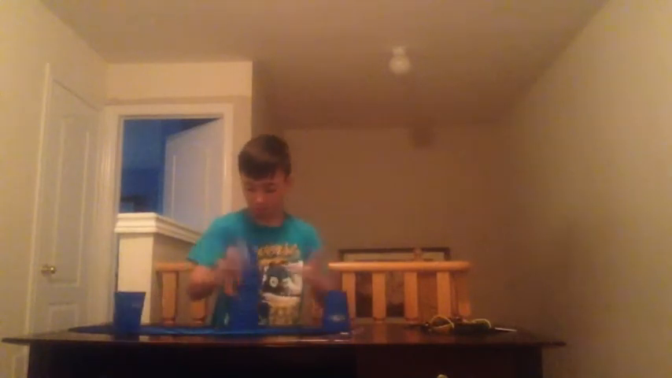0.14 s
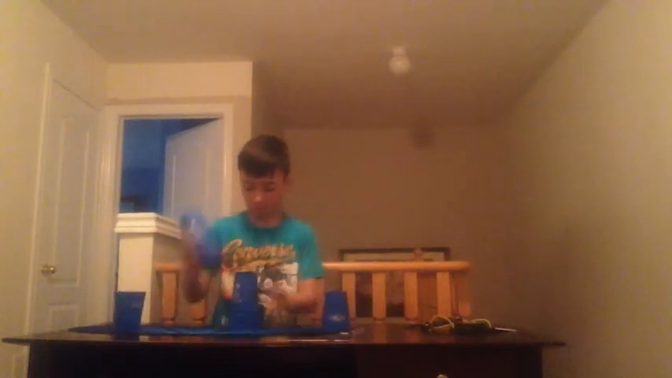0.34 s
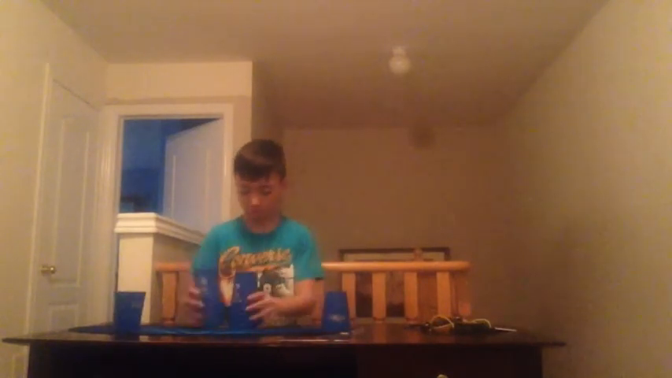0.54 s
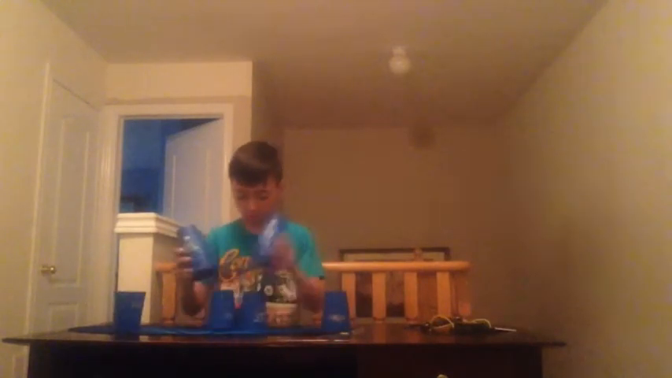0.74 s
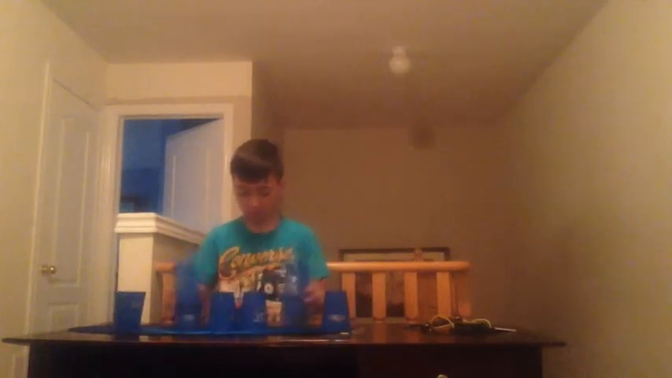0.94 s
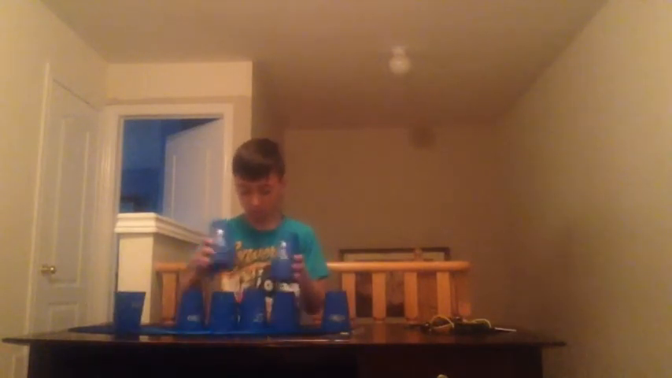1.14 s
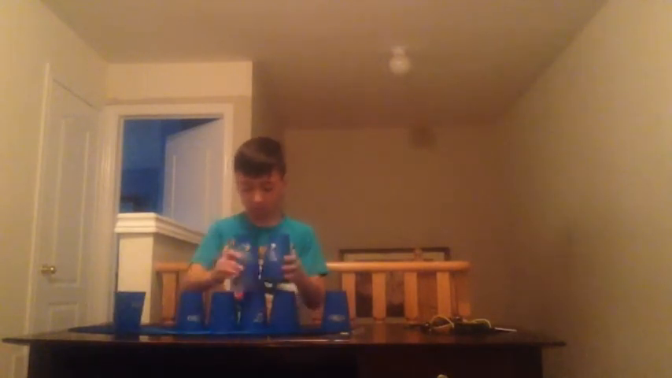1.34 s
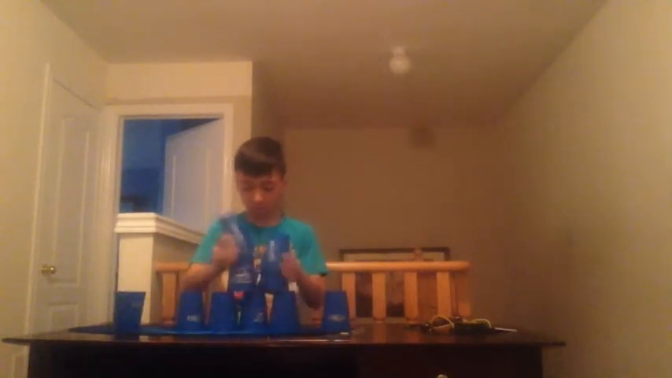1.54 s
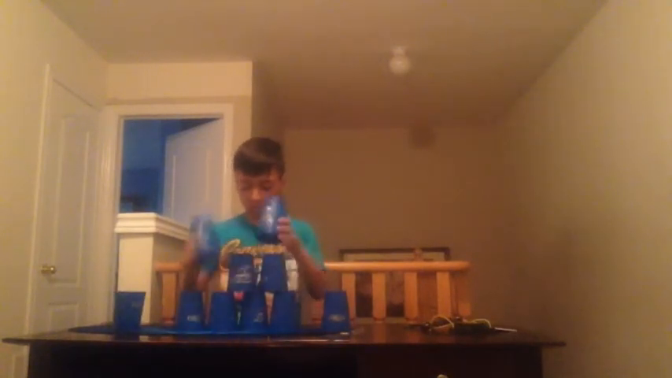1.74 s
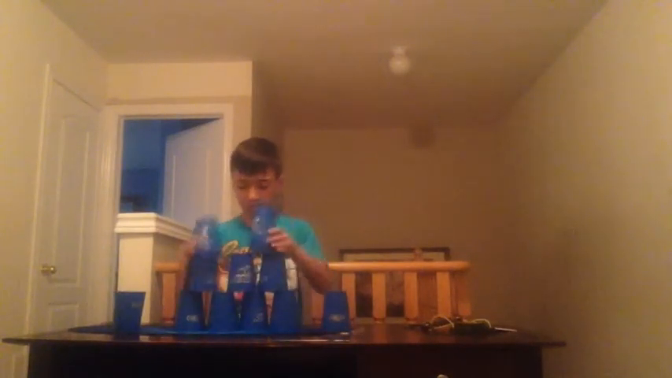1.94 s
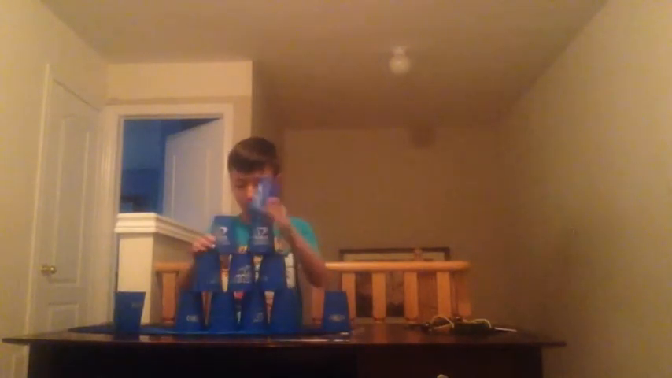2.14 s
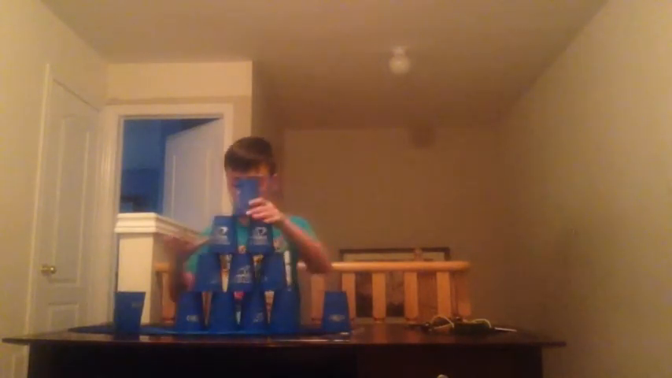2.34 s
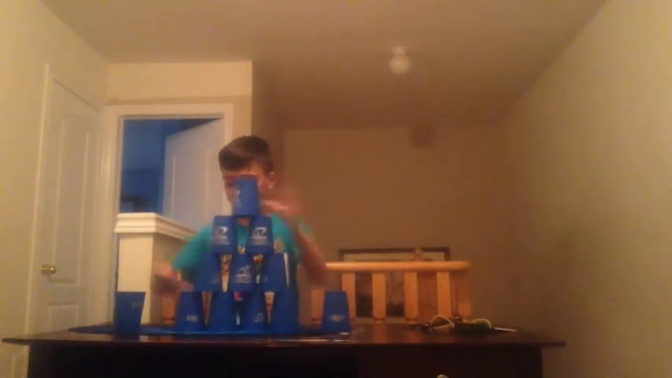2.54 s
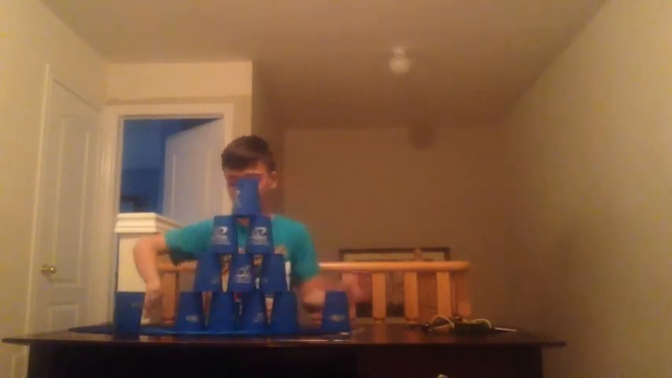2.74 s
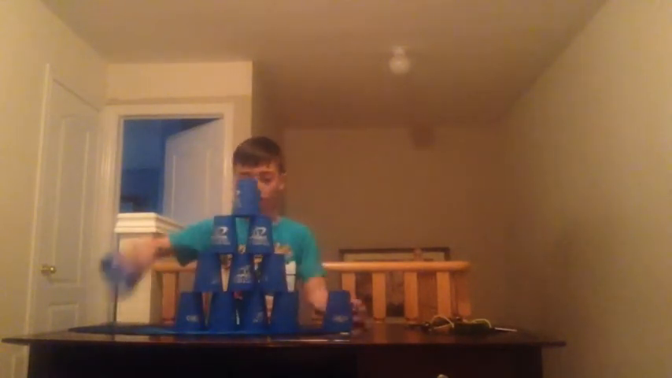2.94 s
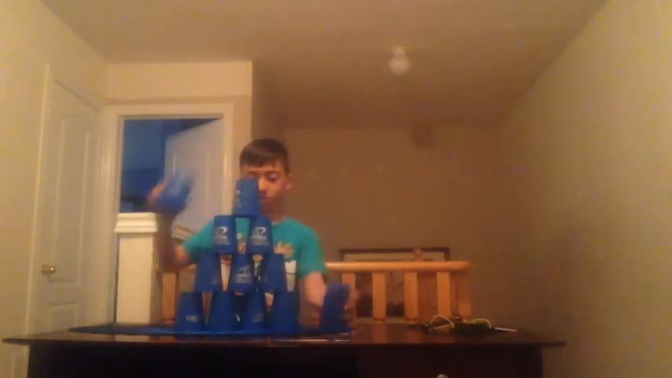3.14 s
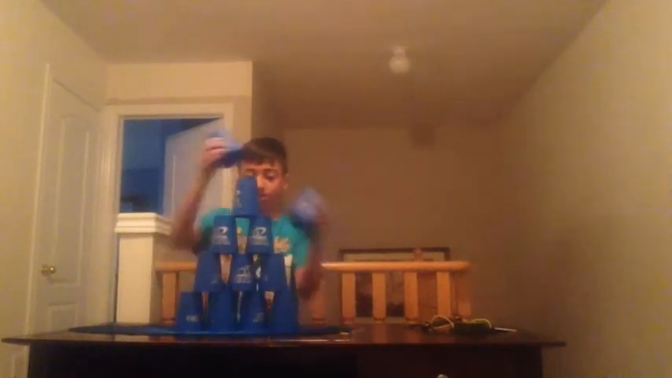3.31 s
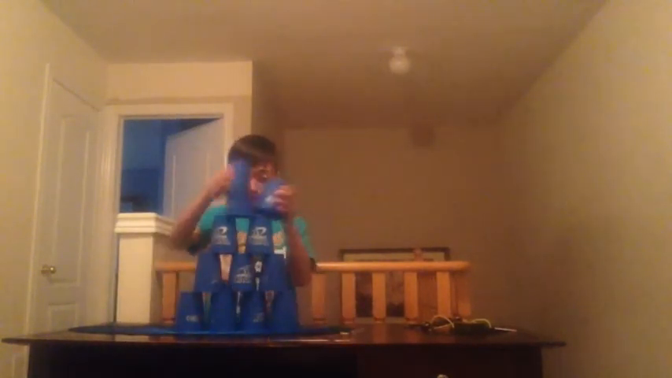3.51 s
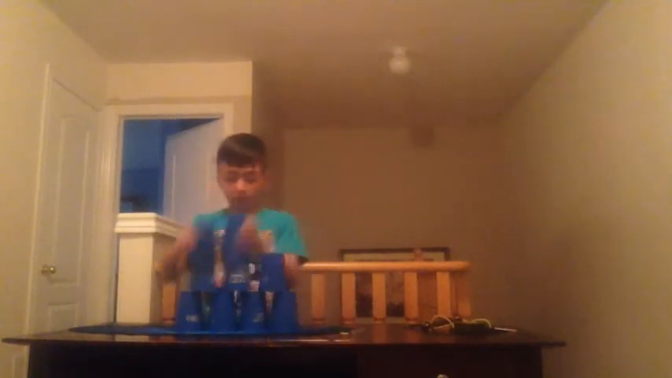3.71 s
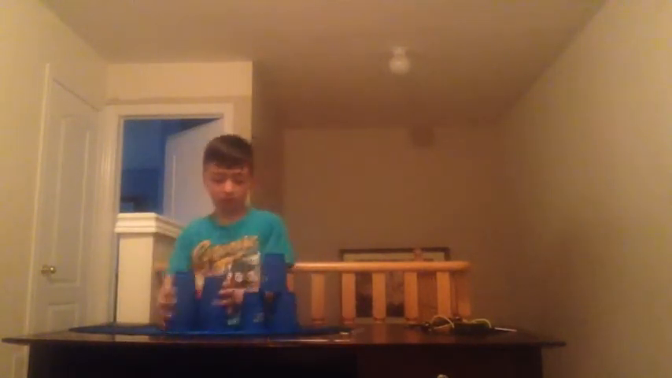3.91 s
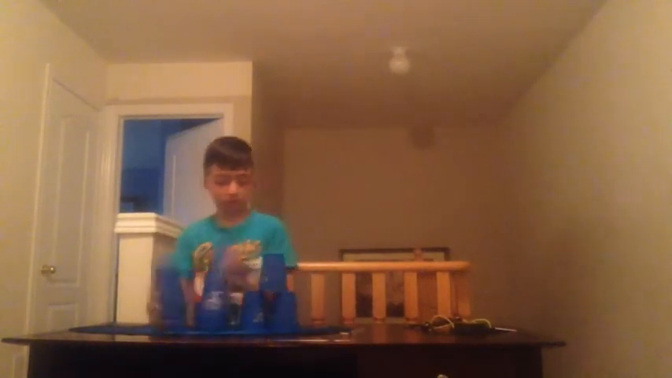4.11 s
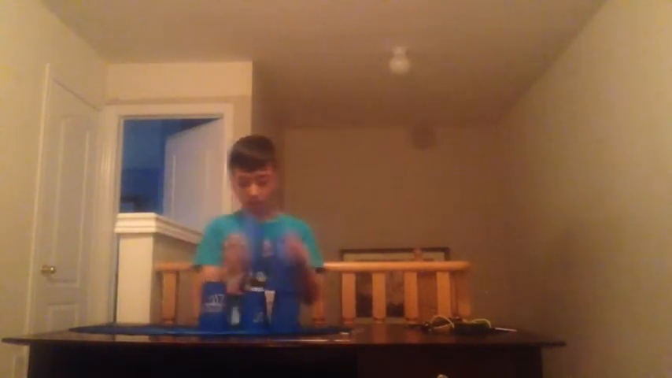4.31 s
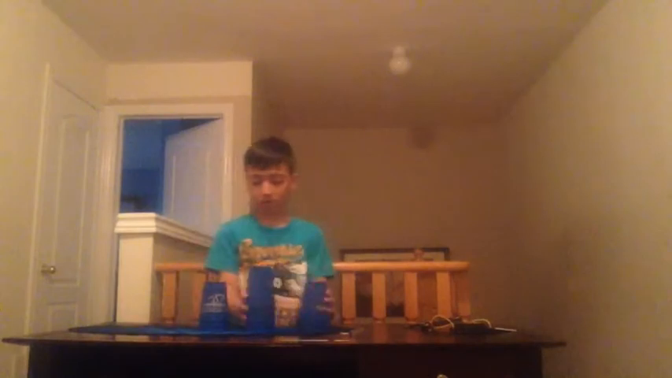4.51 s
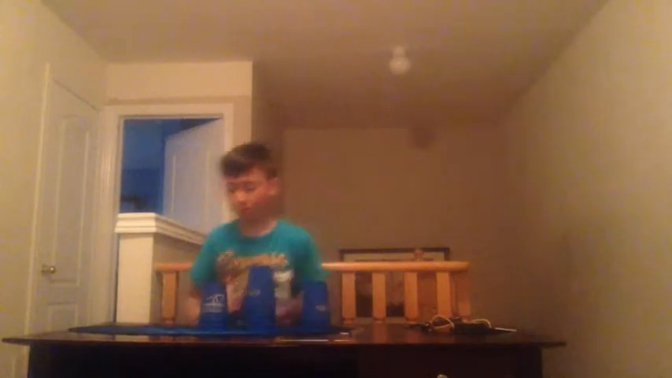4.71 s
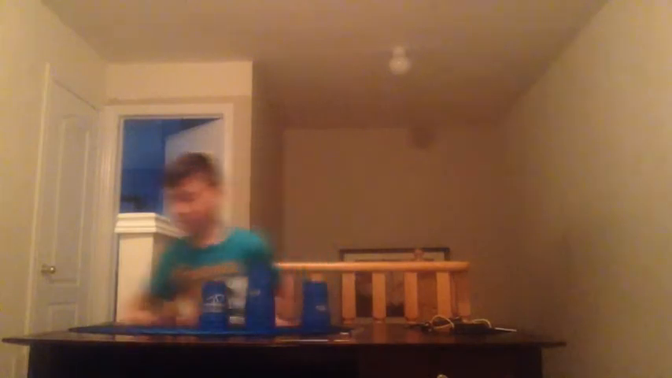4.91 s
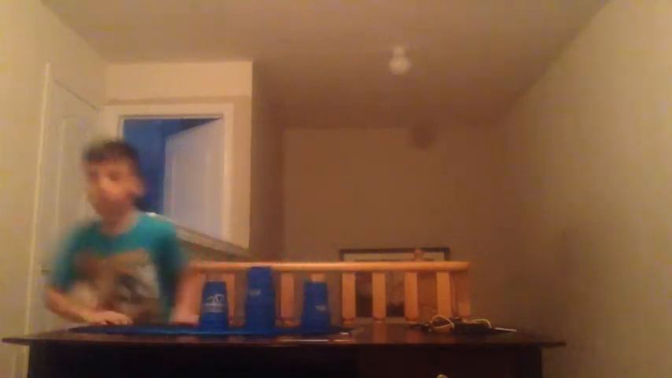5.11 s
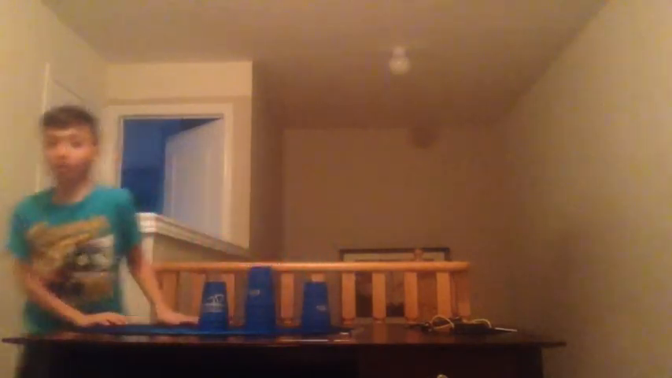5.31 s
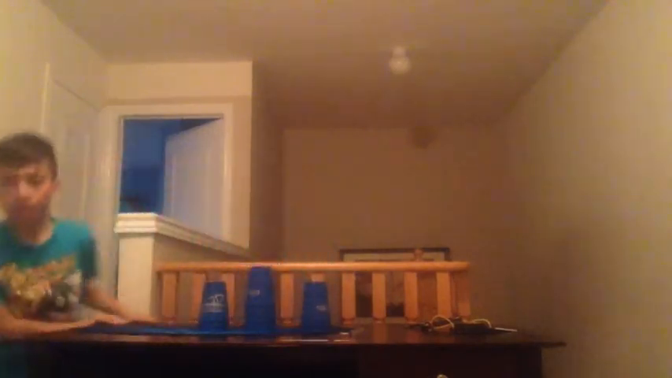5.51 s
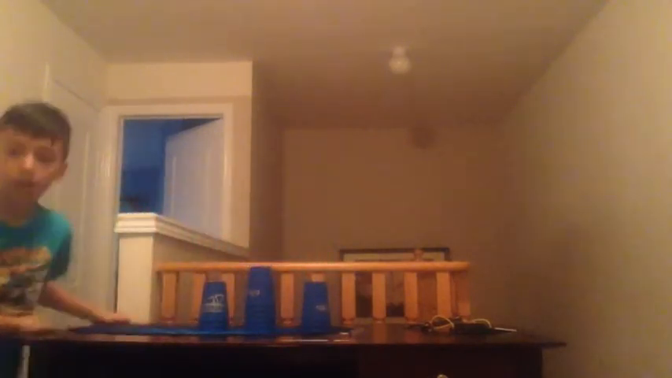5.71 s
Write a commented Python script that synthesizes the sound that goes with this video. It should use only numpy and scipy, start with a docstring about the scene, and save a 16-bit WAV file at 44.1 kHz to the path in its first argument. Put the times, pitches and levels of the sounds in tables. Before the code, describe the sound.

Plastic cups clatter in rapid bursts on a wooden table in a bare, echoing small room, then a palm drags briefly across a mat.

```python
"""Plastic cups are stacked into a pyramid and swept down on a mat on a wooden table in a bare small room.
Quiet air runs throughout. From the start blows ring cup air, cup wall and table as decaying modes; rims tick
as noise bursts, walls clack as modes. Soon cups and hands slide as grainy noise; at the end a palm drags
two resonances of filtered noise. Echoes last half a second; a small microphone cuts the bass and overloads."""
import sys
import numpy as np
from scipy import signal
from scipy.fft import rfft, irfft
from scipy.io import wavfile
from scipy.ndimage import uniform_filter1d

SR = 44100
rng = np.random.default_rng(int(sys.argv[2]) if len(sys.argv) > 2 else 0)


def pcm_store(signal):
    """Save signal as 16-bit PCM."""
    levels = np.round(np.clip(np.atleast_2d(signal), -1, 1) * 32767)
    wavfile.write(sys.argv[1], SR, levels.astype(np.int16).T)


def to_linear_factor(level_db):
    """Convert decibel levels (scalar or array-like) to linear amplitude factors."""
    exponent = np.asarray(level_db, float) / 20
    return 10 ** exponent


N = 254016
TIME_S = np.arange(N) / SR

# spectrum of the quiet air: f/Hz, relative density/dB
AIR_SPECTRUM = [(24, -73.5), (40, -7), (126, 0), (266, -1), (472, -13.5), (522, -7.5), (1220, -10),
                (5580, -21.5), (13000, -26), (15500, -35)]
AIR_DB = -59.5

# cups set down or knocked: t/s, strength/dB, cup air f/Hz, table level re strength/dB
CUP_BLOWS = [(.004, -15, 911, -2), (.048, -17.5, 646, -0.5), (.068, -26.5, 890, 5), (0.18, -25.5, 710, 2),
             (0.213, -23.5, 902, -29), (.518, -23, 890, -4), (.556, -11, 846, -8), (.563, -12, 670, 7),
             (0.635, -39, 653, 4), (0.699, -27.5, 1042, -23), (.775, -25.5, 742, -33),
             (0.802, -29, 810, -2.5), (.922, -1, 793, 0), (0.931, -14.5, 890, 7.5), (.952, -6, 714, -26.5),
             (.976, -4.5, 983, 2), (.999, -14, 556, -19), (1.25, -25, 866, -34), (1.348, -33.5, 896, -20),
             (1.38, -33.5, 842, -25), (1.396, -1.5, 742, -3.5), (1.406, -3.5, 830, -4.5),
             (1.438, -8, 888, -6), (1.495, -9.5, 672, -1), (1.551, -10.5, 810, -6), (1.757, -34, 740, -7),
             (1.843, 4, 788, -6), (1.85, -2, 871, -5.5), (1.88, -5, 737, -2), (1.935, -2, 996, -6),
             (1.969, -3.5, 883, -15), (2.015, -12.5, 948, -8.5), (2.069, -17, 818, -20),
             (2.124, -4.5, 876, -17), (2.132, 0, 983, -14.5), (2.169, -10, 893, -17.5),
             (2.219, -14.5, 900, -16), (2.311, -7, 857, -6.5), (2.32, -0.5, 925, -21.5),
             (2.33, 1, 989, -28.5), (2.352, -4, 983, -30.5), (2.382, -7, 991, -42), (2.83, -47, 826, 8),
             (2.922, -27.5, 417, -3.5), (3.161, -33, 896, -4.5), (3.5, -20.5, 794, -31),
             (3.512, -17, 894, -23), (3.531, -9.5, 910, -17.5), (3.598, -14, 802, -15),
             (3.631, -15.5, 1033, -28), (3.651, -12.5, 844, -9), (3.685, -7, 786, -20),
             (3.71, -7, 825, -22), (3.733, -6.5, 758, -35), (3.761, -11, 810, -10), (3.81, -9, 885, -35),
             (3.839, -9, 936, -11.5), (3.88, -5.5, 928, 2), (3.909, -6.5, 876, 0.5), (3.919, -13.5, 893, 7),
             (3.933, -16.5, 910, 12.5), (4.234, -23.5, 917, 10.5), (4.243, -23.5, 800, -10),
             (4.312, 3, 873, -10), (4.348, -2, 953, -37), (4.403, -16, 902, -9), (4.448, -12, 602, 14),
             (4.456, -4.5, 754, -7), (4.498, -2.5, 991, -13), (4.53, -23, 690, 16),
             (4.789, -28, 1045, 14.5), (4.81, -17, 732, -16), (5.108, -49.5, 800, 11)]
# table top resonances: f/Hz, level/dB, t60/s
TABLE_TOP_MODES = [(142.4, -17.5, 0.16), (214.9, -7.5, 0.24), (246.5, -0.5, 0.13), (266.1, -4, 0.14),
                   (286.4, 5, 0.045), (299.7, -13.5, 0.37), (334.6, -4, 0.18), (394.2, 2, 0.11),
                   (456.6, -7, 0.13), (514, 3, 0.058), (630, 1.5, 0.052)]
# thin cup wall resonances: f/Hz, level/dB, t60/s
CUP_WALL_MODES = [(1250, -1, 0.029), (1521, 1.5, 0.019), (1768, -4.5, 0.022), (1970, -3, 0.03),
                  (2144, -1, 0.042), (2379, -4, 0.038), (3110, -1.5, 0.033)]
PLACES = 4  # on the table, each with its own echoes
CUP_DB, TABLE_DB, WALL_DB = -2, -8.5, 2.5
CUP_T60_S, CONTACT_AT_0DB_S = 0.044, 0.0017
TABLE_TILT = -0.57  # dB an octave above 300 Hz, per dB of table level
WALL_SCATTER, WALL_FOCUS_DB_PER_OCTAVE = 0.03, 27.5
BLOW_WALL_DB, BLOW_WALL_HZ, BLOW_WALL_OCTAVES = -21, 1450, 0.23

# rims clattering together: t/s, strength/dB, brightness/dB
RIM_TICKS = [(.004, -34, 0), (0.037, -36, 1), (.156, -36.5, 2), (0.179, -35, -.5), (.52, -42.5, -6),
             (0.555, -23, -8.5), (0.603, -27, -5), (.805, -42, -12), (0.92, -16.5, 0.5), (.966, -18, 3),
             (1.009, -24.5, -14.5), (1.256, -64, -15), (1.395, -13, -6), (1.495, -22.5, -13.5),
             (1.54, -26.5, -7), (1.585, -29.5, -13), (1.841, -10, -1.5), (1.897, -20, -17),
             (1.935, -20, -7), (1.997, -27, -9), (2.125, -24, -2), (2.166, -29.5, -14), (2.315, -18, -7),
             (2.323, -21.5, -3.5), (2.387, -38, -10), (2.823, -46, -4), (3.5, -33.5, 3.5), (3.6, -28, -3),
             (3.653, -24.5, -1), (3.684, -19.5, -6.5), (3.729, -18.5, 2), (3.813, -9, -8), (3.871, -13, -2),
             (3.906, -14.5, -6), (3.97, -31, -15), (4.012, -21, -28), (4.121, -30.5, 2),
             (4.237, -35.5, -19.5), (4.309, -12, -1), (4.364, -12, 1.5), (4.4, -15, -1), (4.445, -13, -1),
             (4.482, -16.5, -6), (4.524, -21, -25), (4.789, -30.5, -9)]
# spectrum of rim clatter: f/Hz, relative density/dB
RIM_SPECTRUM = [(900, 4.5), (1800, 1), (2600, 0.5), (3600, -9), (4900, -3), (6500, -12), (8300, -13),
                (11500, -18), (15500, -34)]
RIM_DB = -1.5
TICK_RISE_AT_0DB_S, TICK_DECAY_S, TICK_SOFTENING = 0.0021, 0.012, 0.15

# cup walls clacking together: t/s, strength/dB, struck wall mode f/Hz
WALL_CLACKS = [(0.049, -25.5, 1480), (.068, -26.5, 1510), (.181, -28, 1560), (0.519, -32, 1390),
               (0.555, -19, 1580), (0.564, -16.5, 1680), (.599, -28, 2370), (.803, -42.5, 2150),
               (1.252, -34, 1530), (1.407, -5, 1240), (1.439, -9, 1250), (1.497, -10, 1450),
               (1.551, -14.5, 1200), (1.879, -15.5, 1250), (1.936, -14, 1510), (2.132, -19, 1980),
               (2.33, -10.5, 2200), (3.651, -17.5, 2030), (3.685, -16.5, 1250), (3.734, -4.5, 1500),
               (3.761, -17, 1560), (3.809, -9, 1390), (3.838, -15, 1520), (3.875, -3, 1760),
               (3.883, -2, 2000), (3.908, -6, 1290), (3.919, -6, 1970), (3.934, -3.5, 1380),
               (3.959, -8, 1860), (4.235, -21, 1505), (4.312, -16.5, 2410), (4.448, -2.5, 1500),
               (4.456, 0.5, 1620), (4.477, -1.5, 1590), (4.499, -3.5, 1600), (4.529, -9, 1516),
               (4.81, -41, 1400), (5.576, -52, 2450)]

# sliding of cups, hands and sleeves, one table a stretch: t/s, level/dB, dullness/dB
SLIDE_STRETCHES = [
    [(.4, -77, -5), (.5, -62, 5)],
    [(.7, -45, 10), (.75, -63, -4), (.81, -63, -4), (.9, -90, -10)],
    [(1.15, -58, -6), (1.22, -69.5, 18), (1.32, -79, 7), (1.38, -42.5, -15)],
    [(2.72, -68, -3), (2.88, -69, -5), (2.935, -58, -6), (2.97, -63.5, -0.5), (3.17, -59.5, -6),
     (3.3, -75, 5)],
    [(3.5, -39.5, -7), (3.7, -59.5, 13), (3.74, -47.5, 6.5), (3.82, -36.5, 11.5), (3.875, -42.5, 16),
     (3.92, -41, 16), (4.3, -74, -7)],
    [(4.7, -56, 22), (4.8, -57, 11), (4.91, -65, 5), (4.99, -55.5, -16), (5.15, -54.5, -8.5),
     (5.39, -66.5, 9), (5.5, -51, -8.5), (5.62, -55, 1.5), (5.76, -63.5, 10)],
]
# spectrum of sliding friction: f/Hz, relative density/dB
SLIDE_SPECTRUM = [(59, -56), (100, -2), (162, -14), (320, -3), (552, -7.5), (977, 2), (1290, -12),
                  (1730, -5.5), (2810, -10.5), (3850, -13), (4960, -11.5), (15500, -30.5)]
SLIDE_DB = -2.5

# palm dragging on the mat in two strokes: t/s, low resonance level/dB, high resonance level/dB
PALM_DRAG = [(4.95, -57, -60), (4.978, -69, -55), (5.11, -55, -56), (5.158, -54, -56),
             (5.374, -64.5, -63.5), (5.492, -55, -54), (5.498, -69, -53.5), (5.76, -71, -58.5)]
DRAG_HZ, DRAG_WIDTH_HZ = (1703, 2410), (190, 940)

# decay of the room by band: f/Hz, t60/s
ROOM_DECAY = [(150, 0.26), (400, 0.41), (1000, 0.46), (2500, 0.4), (6000, 0.38), (12000, 0.28)]
ROOM_DB, TABLE_ROOM_DB = -2, -6.5
HALL_DB, HALL_STRETCH = -21, 1.89  # hallway behind the open door: weaker, longer
MIC_LOW_HZ, DRIVE = 136.7, 1.24


def coloured(x, points):
    """Shapes x by a spectrum of (f/Hz, level/dB) points, to rms 1."""
    hz, db = np.transpose(points)
    grid_hz = np.maximum(np.arange(len(x) // 2 + 1) * SR / len(x), 1)
    gain = to_linear_factor(np.interp(np.log(grid_hz), np.log(hz), db))
    y = irfft(rfft(x) * gain, len(x))
    return y / np.sqrt(np.mean(y ** 2))


def walk(rate_hz):
    """Random levels held 1 / rate_hz and slewed twice; spread near 1."""
    hold = int(SR / rate_hz)
    steps = np.repeat(rng.standard_normal(N // hold + 1), hold)
    return 1.3 * uniform_filter1d(uniform_filter1d(steps, hold), hold)[:N]


def quiet_air():
    """Coloured noise whose level wanders slowly."""
    return to_linear_factor(AIR_DB + 2 * walk(0.91)) * coloured(rng.standard_normal(N), AIR_SPECTRUM)


def contact_s(db):
    """A lighter blow is a softer, longer push."""
    return CONTACT_AT_0DB_S * to_linear_factor(-0.25 * db)


def add_modes(out, s, hz, db, t60_s, push_s):
    """Adds decaying modes at time s; the contact lets them swell over a moment."""
    start = int(s * SR)
    t = TIME_S[:min(16384, N - start), None]
    decay = np.exp(-np.log(1000) * t / t60_s)
    swell = (1 - np.exp(-t / push_s)) ** 2
    ring = np.sin(2 * np.pi * hz * t) * decay * swell
    out[start:start + len(t)] += ring @ to_linear_factor(db)


def wall_modes(db, struck_hz):
    """f/Hz, level/dB and t60/s of the cup wall, strongest near the struck mode."""
    hz, mode_db, t60_s = np.transpose(CUP_WALL_MODES)
    focus_db = -WALL_FOCUS_DB_PER_OCTAVE * np.abs(np.log2(hz / struck_hz))
    scattered_hz = hz * (1 + WALL_SCATTER * rng.standard_normal(len(hz)))
    return scattered_hz, db + WALL_DB + mode_db + focus_db, t60_s


def blows():
    """Each blow shakes cup air, cup wall and table top; returns a row for each place, and the table top."""
    places, table = np.zeros((PLACES, N)), np.zeros(N)
    table_hz, table_db, table_t60_s = np.transpose(TABLE_TOP_MODES)
    for k, (s, db, air_hz, low_db) in enumerate(CUP_BLOWS):
        place = places[k % PLACES]
        # neighbouring cups give close companions to the main air note
        notes_hz = air_hz * np.array([1, 0.92, 1.09]) * (1 + 0.016 * rng.standard_normal(3))
        notes_db = db + CUP_DB + np.array([0, -6, -7])
        add_modes(place, s, notes_hz, notes_db, CUP_T60_S, contact_s(db))
        # the wall is stirred at a chance spot
        spot_hz = BLOW_WALL_HZ * 2 ** (BLOW_WALL_OCTAVES * rng.standard_normal())
        add_modes(place, s, *wall_modes(db + BLOW_WALL_DB, spot_hz), 0.25 * contact_s(db))
        # a blow that reaches the table only through other cups favours its high modes
        tilt_db = TABLE_TILT * low_db * np.log2(table_hz / 300)
        chance_hz, chance_db = rng.standard_normal((2, len(table_hz)))
        shake_hz = table_hz * (1 + 0.0096 * chance_hz)
        shake_db = db + low_db + TABLE_DB + table_db + tilt_db + 2.5 * chance_db
        add_modes(table, s, shake_hz, shake_db, table_t60_s, 2.26 * contact_s(db))
    return places, table


def grains(spread_db):
    """Noise of many tiny contacts of uneven size."""
    size_db = spread_db * np.minimum(rng.exponential(size=N), 4.0)
    return rng.standard_normal(N) * to_linear_factor(size_db)


def split(x, hz):
    """x below and above hz."""
    low = signal.sosfiltfilt(signal.butter(2, hz, fs=SR, output="sos"), x)
    return low, x - low


def rims():
    """Each meeting of rims is a short burst of contacts, coloured by the thin plastic."""
    low, high = split(coloured(grains(2.5), RIM_SPECTRUM), 6500)
    out = np.zeros(N)
    t = TIME_S[:8192]
    for s, db, bright_db in RIM_TICKS:
        start = int(s * SR)
        at = slice(start, start + len(t))
        rise_s = TICK_RISE_AT_0DB_S * to_linear_factor(-TICK_SOFTENING * db)  # lighter rims meet more slowly
        burst = (1 - np.exp(-t / rise_s)) ** 2 * np.exp(-t / TICK_DECAY_S)
        out[at] += to_linear_factor(db + RIM_DB) * burst * (low[at] + to_linear_factor(bright_db) * high[at])
    return out


def clacks():
    """Cup walls meet and ring near the struck mode; one row for each place."""
    places = np.zeros((PLACES, N))
    for k, (s, db, struck_hz) in enumerate(WALL_CLACKS):
        add_modes(places[k % PLACES], s, *wall_modes(db, struck_hz), 0.42 * contact_s(db))
    return places


def sliding():
    """Dense tiny grains of friction; a duller share swells on its own."""
    low, high = split(coloured(grains(2.1), SLIDE_SPECTRUM), 2610)
    out = np.zeros(N)
    for stretch in SLIDE_STRETCHES:
        s, level_db, dull_db = np.transpose(stretch)
        fade = np.clip(np.minimum(TIME_S - s[0], s[-1] + 0.031 - TIME_S) / 0.1, 0, 1)
        level = to_linear_factor(np.interp(TIME_S, s, level_db))
        dullness = to_linear_factor(np.interp(TIME_S, s, dull_db))
        out += fade * level * (high + low * dullness)
    return out / np.std(high) * to_linear_factor(SLIDE_DB + 0.88 * walk(30))


def drag_resonance(s, db, hz, width_hz):
    """Stick and slip feed one resonance: low-passed noise on two quadrature carriers."""
    fade = np.clip((TIME_S - s[0]) / 0.024, 0, 1)
    low_pass = signal.butter(2, width_hz / 2, fs=SR, output="sos")
    slip = signal.sosfilt(low_pass, rng.standard_normal((2, N)))
    phase = 2 * np.pi * hz * TIME_S
    ring = slip[0] * np.cos(phase) + slip[1] * np.sin(phase)
    level_db = np.interp(TIME_S, s, db) + 1.6 * walk(35)
    return fade * to_linear_factor(level_db) * ring / np.std(ring)


def palm_drag():
    """A palm dragging on the mat sounds two resonances."""
    s, *levels_db = np.transpose(PALM_DRAG)
    return sum(drag_resonance(s, *one) for one in zip(levels_db, DRAG_HZ, DRAG_WIDTH_HZ))


def room(x, wet_db):
    """Dense reflections from bare walls; each band dies at its own pace."""
    t = TIME_S[:SR]
    band_hz = np.transpose(ROOM_DECAY)[0]
    edges_hz = [60, *np.sqrt(band_hz[:-1] * band_hz[1:]), 18000]
    tail = np.zeros(SR)
    for low_hz, high_hz, (_, t60_s) in zip(edges_hz, edges_hz[1:], ROOM_DECAY):
        band_pass = signal.butter(2, (low_hz, high_hz), "band", fs=SR, output="sos")
        band = signal.sosfilt(band_pass, rng.standard_normal(SR))
        near = np.exp(-np.log(1000) * t / t60_s)
        hall = to_linear_factor(HALL_DB) * np.exp(-np.log(1000) * t / (HALL_STRETCH * t60_s))
        tail += band * (near + hall)
    tail *= 1 - np.exp(-(t / 0.0011) ** 2)  # the reflections build up within about 2 ms
    tail /= np.sqrt(np.sum(tail ** 2))
    return x + to_linear_factor(wet_db) * signal.fftconvolve(x, tail)[:N]


def scene():
    """Cups, rims and friction in the room, over quiet air; each place on the table has its own echoes."""
    air = quiet_air()
    places, table = blows()
    ticks = rims()
    places = places + clacks()
    friction = sliding() + palm_drag()
    cups = sum(room(place, ROOM_DB) for place in places)
    table = room(table, TABLE_ROOM_DB)  # the table top is close by
    return (cups + table + room(ticks + friction, ROOM_DB) + air)[None]


def band_limit(x):
    """A steep low-pass at the top of the band."""
    return signal.sosfilt(signal.butter(12, 15880, fs=SR, output="sos"), x)


def record(dry):
    """The microphone drops the bass and rounds off the hardest peaks."""
    high_pass = signal.butter(6, MIC_LOW_HZ, "high", fs=SR, output="sos")
    driven = DRIVE * signal.sosfilt(high_pass, dry)
    mix = driven / (1 + np.abs(driven) ** 4) ** (1 / 4)
    return band_limit(mix)


dry = scene()
out = record(dry)
pcm_store(out)
```